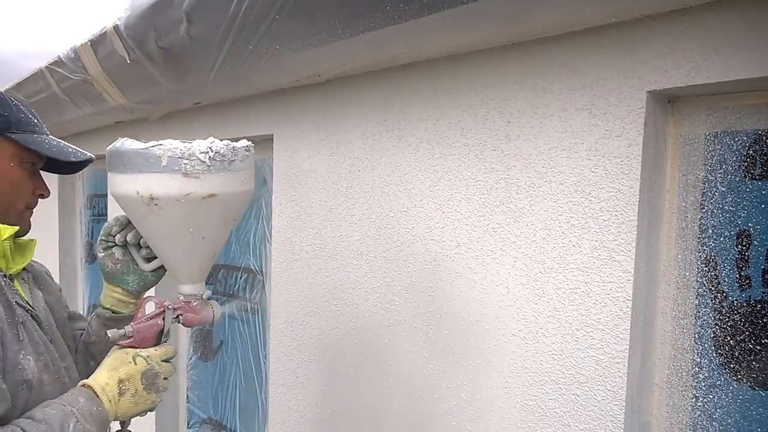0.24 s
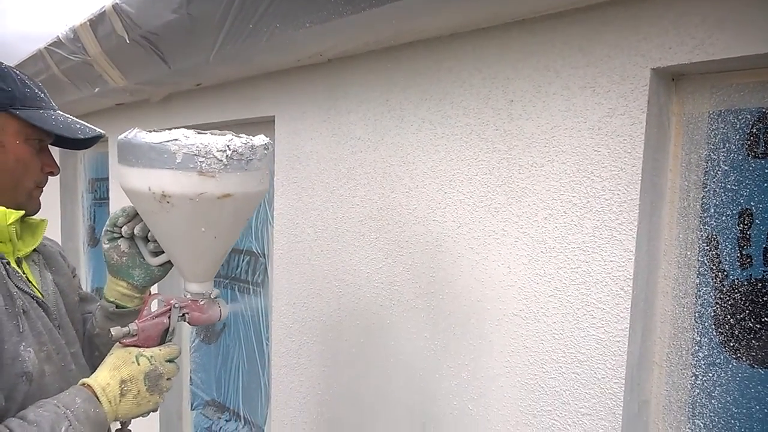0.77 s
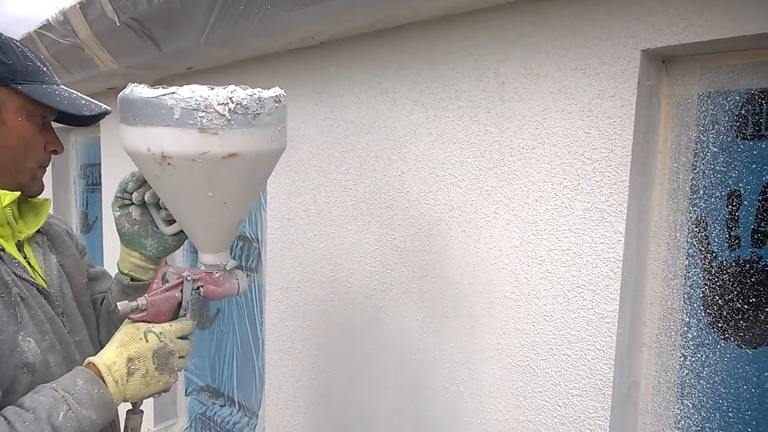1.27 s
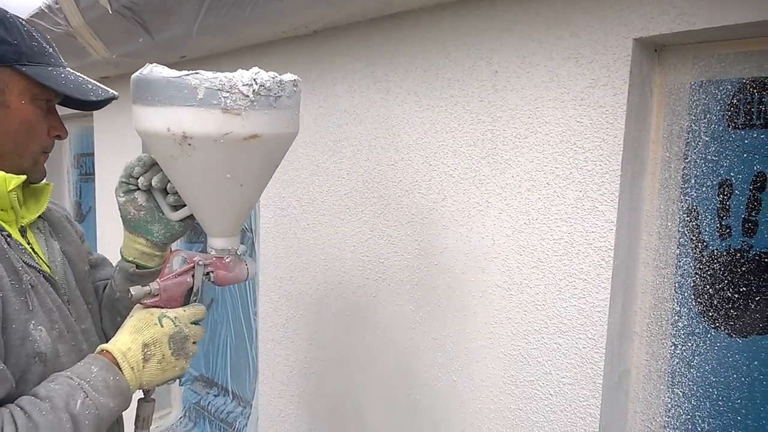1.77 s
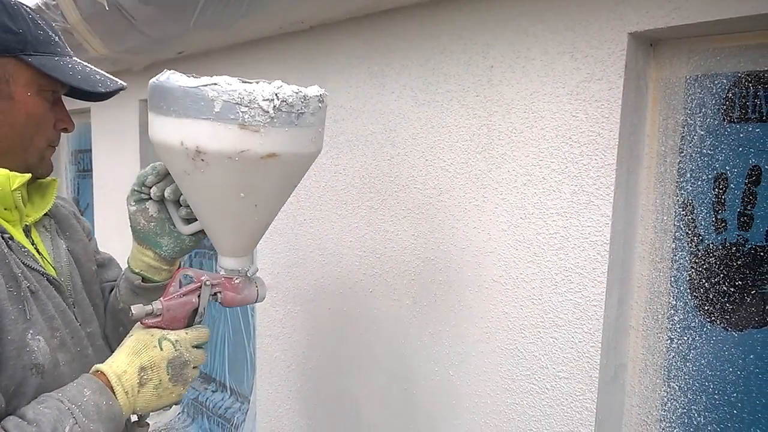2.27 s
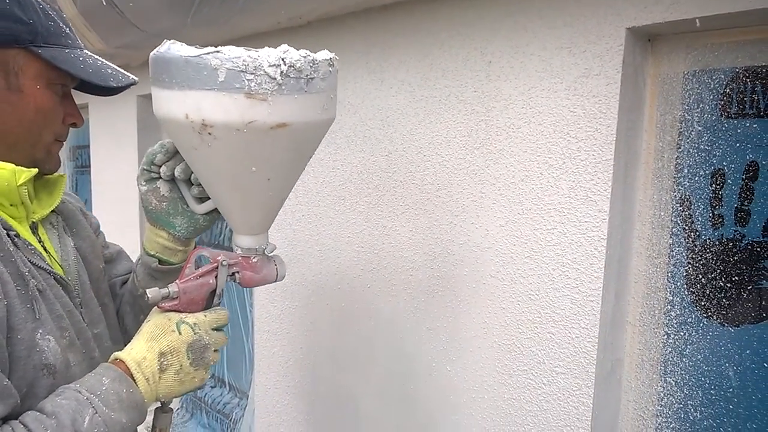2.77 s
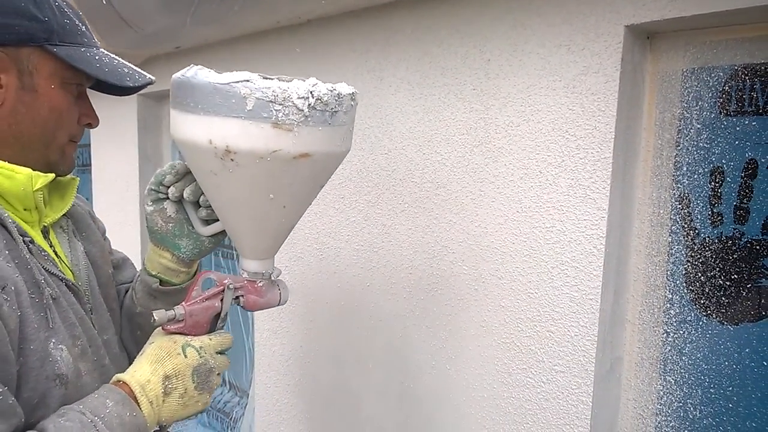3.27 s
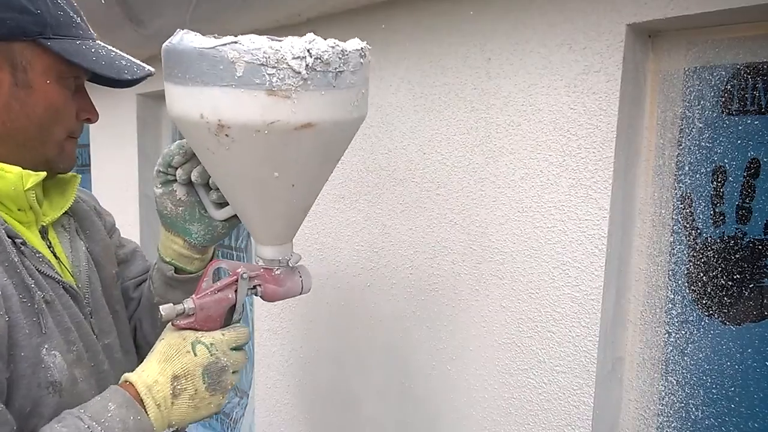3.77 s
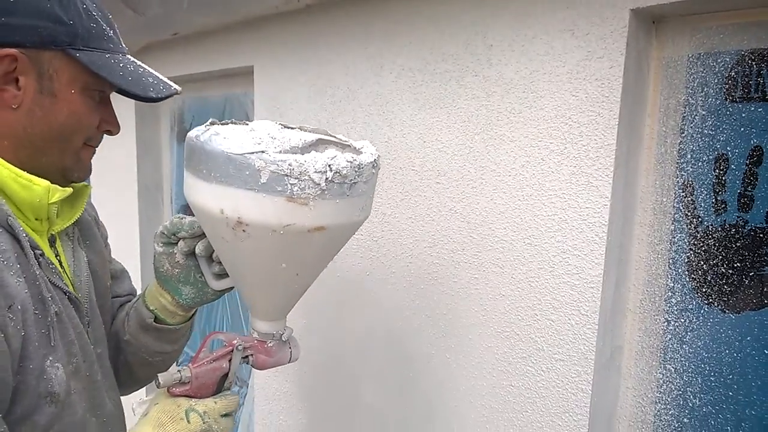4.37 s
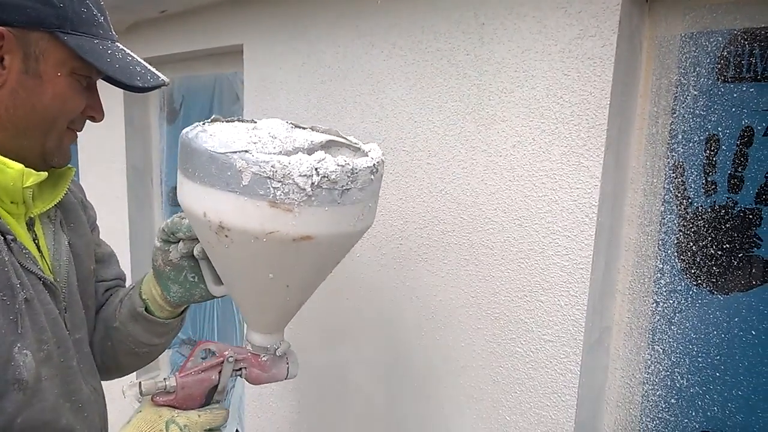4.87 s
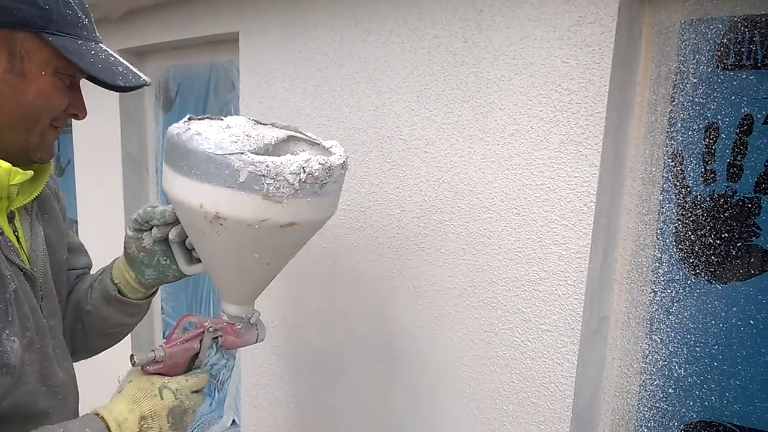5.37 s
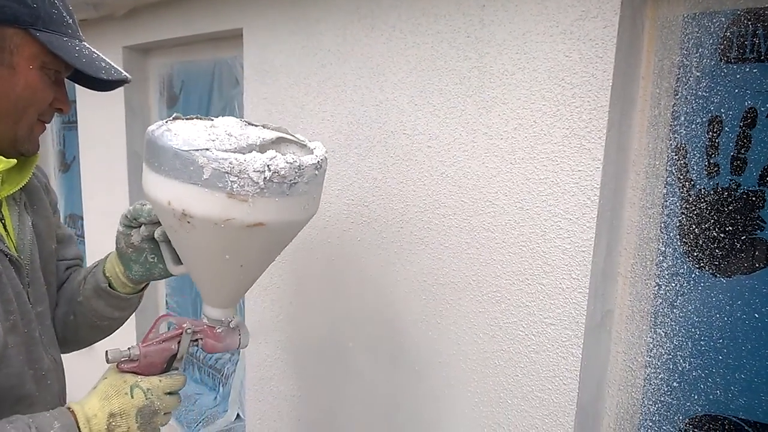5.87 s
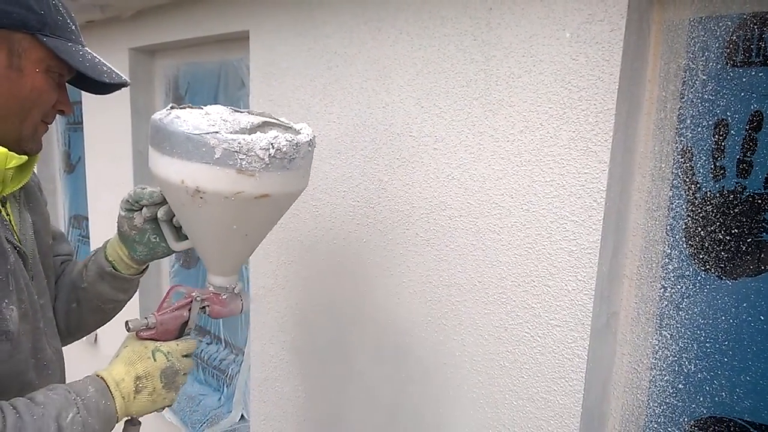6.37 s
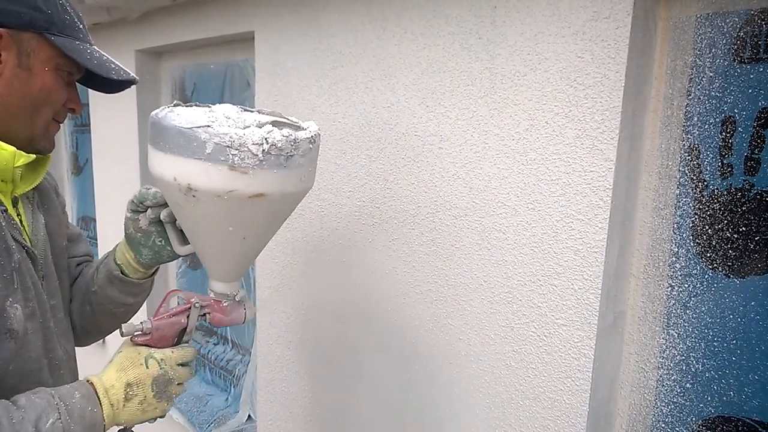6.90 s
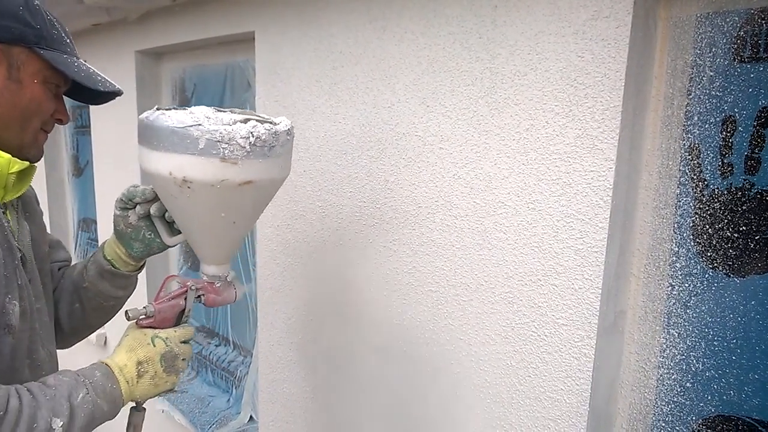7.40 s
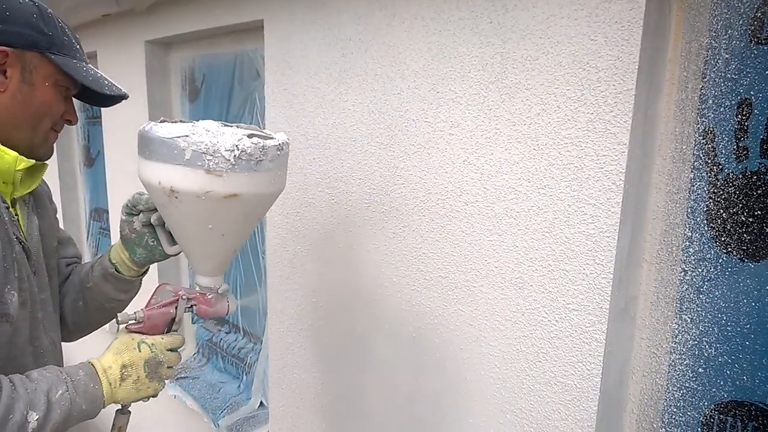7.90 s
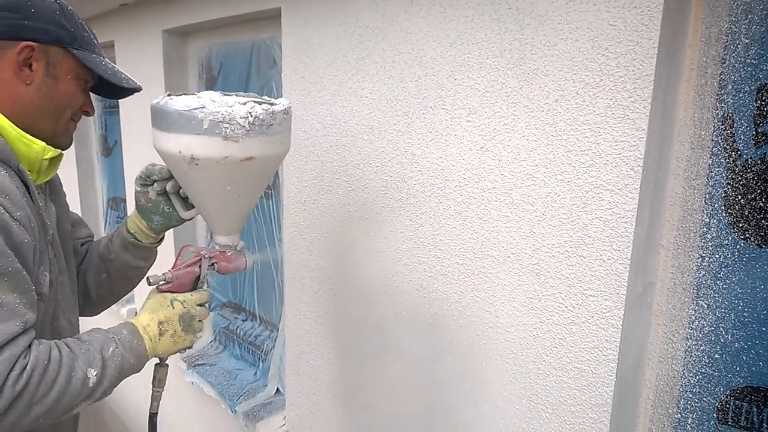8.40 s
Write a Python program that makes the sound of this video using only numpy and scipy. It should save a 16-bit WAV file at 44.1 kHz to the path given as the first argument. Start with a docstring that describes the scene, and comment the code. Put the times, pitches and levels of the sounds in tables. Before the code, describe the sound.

Outdoors by a house wall, compressed air streams from a plaster gun in a continuous, bright hiss. After two brief squeaks, a spitting spray builds, with fine ticking grit and short slurping surges, almost whistling midway and easing toward the end. Dull handling taps, a faint low rumble and small puffs of air on the microphone stay far behind the hiss.

```python
"""A hopper gun sprays plaster on an outside wall. From the start, compressed air hisses from its nozzle,
combed by the wall's echo as the gun sways, over soft knocks and a faint, puffy outdoor rumble.
The nozzle squeaks twice in the first second. From about 2 s, plaster torn up in the jet swells to a
sputtering rush with wet surges and a fine patter of grit. Near 4 s the nozzle almost whistles.
After 6 s the spray sinks back under the steadier hiss."""
import sys
import numpy as np
from scipy import signal
from scipy.fft import rfft, irfft, next_fast_len
from scipy.io import wavfile
from scipy.ndimage import uniform_filter1d, map_coordinates

SR = 44100
rng = np.random.default_rng(int(sys.argv[2]) if len(sys.argv) > 2 else 0)


def master_out(mix):
    """Clip the mix to full scale and print it as 16-bit PCM to the path in sys.argv[1]."""
    frames = np.transpose(np.atleast_2d(mix))
    ceiling = np.clip(frames, -1, 1)
    pcm = np.round(ceiling * 32767).astype(np.int16)
    wavfile.write(sys.argv[1], SR, pcm)


N = 381465


# air hiss: (time [s], level [dB])
AIR_LEVEL = [(0, -51), (.8, -49.5), (1.2, -50), (1.42, -49), (1.95, -49.5), (2.3, -48.8), (3.05, -49),
             (3.8, -49.5), (4.05, -50), (4.5, -49.2), (4.9, -50.5), (5.8, -48.5), (6.3, -50), (6.95, -48.5),
             (7.35, -50), (7.8, -51), (8.6, -51)]
# air jet spectrum: (frequency [Hz], relative density [dB])
AIR_SPECTRUM = [(1500, -41), (2450, -31), (2900, -25), (3500, -26), (4000, -29), (4400, -23.5),
                (5500, -18.5), (6300, -4.5), (7050, 0), (7900, -2.5), (9000, -7.5), (10300, -6.5),
                (11700, -1.7), (12900, -5), (13800, -9.5), (15800, -8)]

def air_jet(wander_share=0.007, wander_per_s=3):
    """Air leaves the nozzle in a slightly spitting hiss; its resonances wander as the gun turns."""
    flutter = spurts(per_s=83, fade_s=0.0071, depth=0.26) * amp(0.74 * wobble(350))
    hiss = coloured(turbulence(patchy_db=1.12), AIR_SPECTRUM)
    read_at = np.cumsum(1 + wander_share * wobble(wander_per_s))
    wandering = map_coordinates(hiss, [read_at], order=5, mode="mirror")
    return amp(curves(AIR_LEVEL)[0]) * unit(wandering * flutter)


# plaster spray: (time [s], level [dB])
PLASTER_LEVEL = [(0.0, -58.5), (1.25, -68), (1.45, -59), (1.8, -65), (2.12, -56), (2.27, -52), (2.45, -54),
                 (2.68, -56), (2.87, -48), (3.17, -50.5), (3.3, -50.5), (3.5, -52.5), (3.72, -49.5),
                 (4.1, -52.5), (4.32, -51.5), (4.47, -47), (4.8, -51), (5.15, -49.5), (5.5, -51),
                 (5.76, -49.5), (6.06, -50), (6.3, -55), (6.55, -53), (6.72, -55.5), (6.95, -52.5),
                 (7.24, -57), (7.5, -65), (7.75, -55.5), (8.1, -55), (8.4, -65), (8.6, -58)]
# plaster break-up spectrum: (frequency [Hz], relative density [dB])
PLASTER_SPECTRUM = [(2500, -38.5), (3400, -22.5), (4000, -26.5), (4550, -14.5), (5150, -8.5), (5550, -14),
                    (6700, 2.5), (7500, 0.8), (8500, -5), (9200, -1.5), (10400, 3.5), (12000, -1.5),
                    (13300, -3.5), (14200, -4.5), (15800, -4.5)]

def plaster(grains_per_s=2700, grit_share=0.21):
    """Lumps of plaster tear apart in spurts; their sand grains tick at random."""
    level_db = curves(PLASTER_LEVEL)[0] + 0.1 * wobble(22)
    feed = spurts(per_s=54, fade_s=0.0057, depth=0.45) * amp(0.78 * wobble(400))
    grit = unit(rng.standard_normal(N) * (rng.random(N) < grains_per_s / SR))
    spray = np.sqrt(1 - grit_share) * turbulence(patchy_db=1.0) + np.sqrt(grit_share) * grit
    return amp(level_db) * unit(coloured(spray * feed, PLASTER_SPECTRUM))


# wet surges: (time [s], half width [s], peak level [dB], centre [Hz])
WET_SURGES = [(1.44, .07, -74.5, 4600), (2.3, 0.35, -74.5, 4630), (3.07, .07, -68, 5000),
              (4.098, 0.12, -75.5, 3700), (5.08, .11, -80, 3700), (5.636, 0.044, -67, 4950),
              (6.002, .12, -70, 4600), (7.03, 0.11, -68.5, 4800), (7.9, 0.14, -82, 4000)]
# surge spectrum: (frequency [x centre], relative density [dB])
SURGE_SPECTRUM = [(.5, -31), (.8, -11.5), (.92, -7), (1, 2), (1.12, 2), (1.28, -16), (1.85, -34)]

def surges():
    """Thicker plaster passes the nozzle with a lower, slurping rush, each surge at its own pitch."""
    feed = turbulence(patchy_db=5.5) * spurts(per_s=80, fade_s=0.023, depth=1.5)
    out = np.zeros(N)
    for time_s, half_width_s, peak_db, centre_hz in WET_SURGES:
        rush = unit(coloured(feed, np.array(SURGE_SPECTRUM) * [centre_hz, 1]))
        out += swell(time_s, half_width_s, peak_db) * rush
    return out


# nozzle squeaks: (time [s], half width [s], peak level [dB], pitch [Hz])
NOZZLE_SQUEAKS = [(.17, 0.057, -55, 12100), (.72, .08, -59, 12800)]

def squeaks():
    """The nozzle gives brief, thin squeaks."""
    return sum(swell(time_s, half_width_s, peak_db) * breathy_tone(pitch_hz, half_band_hz=300)
               for time_s, half_width_s, peak_db, pitch_hz in NOZZLE_SQUEAKS)


# nozzle whistle: (time [s], pitch [Hz], level [dB])
NOZZLE_WHISTLE = [(3.4, 5280, -88), (3.8, 5360, -74), (4.2, 5200, -71), (4.55, 5090, -77), (4.8, 5100, -72),
                  (5.15, 5330, -77), (5.6, 5300, -85)]

def whistle():
    """The nozzle nearly whistles; the pitch sags and recovers."""
    pitch_hz, level_db = curves(NOZZLE_WHISTLE)
    return amp(level_db) * breathy_tone(pitch_hz, half_band_hz=160)


# top sizzle: (time [s], level [dB])
SIZZLE_LEVEL = [(0, -76), (.82, -69), (1.02, -63), (1.75, -67), (2.1, -58), (2.7, -72), (3.15, -54),
                (3.48, -64), (3.7, -61), (4.1, -65), (4.7, -64), (5.4, -67), (5.9, -80), (6.1, -64),
                (6.6, -57), (7.05, -63), (7.35, -75), (8.4, -70)]
# sizzle spectrum: (frequency [Hz], relative density [dB])
SIZZLE_SPECTRUM = [(11000, -30), (13300, -11), (14300, -9), (15800, -1)]

def sizzle():
    """A thin sizzle at the very top comes and goes."""
    return amp(curves(SIZZLE_LEVEL)[0]) * unit(coloured(turbulence(patchy_db=0.7), SIZZLE_SPECTRUM))


# turning points of the gun's sway: (time [s], echo lag [ms])
SWAY_TURNS = [(0, 1.66), (1.02, 1.525), (1.43, 1.63), (1.88, 1.565), (2.32, 1.675), (2.6, 1.625),
              (3.1, 1.735), (3.48, 1.65), (4.08, 1.845), (4.55, 1.675), (4.95, 1.775), (5.5, 1.55),
              (5.92, 1.68), (6.5, 1.48), (6.95, 1.615), (7.5, 1.385), (8.0, 1.325), (8.65, 1.33)]
# wall reflection: (frequency [Hz], gain [dB])
WALL_GAIN = [(3000, -17), (5300, -15.5), (6500, -11.5), (7500, -9), (8500, -13), (9600, -25), (11500, -16),
             (13200, -18.5), (15000, -18)]

def wall_echo(gun):
    """The wall returns the hiss after a changing lag, so a comb of peaks glides through it."""
    read_at = np.arange(N) - swing(SWAY_TURNS) * SR / 1000
    return coloured(map_coordinates(gun, [read_at], order=5), WALL_GAIN)


def nearby_echoes(gun, first_ms=1.0, last_ms=8, drift_ms=0.195, gain_db=-20, fade_db_per_ms=0.37):
    """Weak paths off hopper, worker and window recesses drift as the worker moves, rippling the hiss."""
    out = np.zeros(N)
    for lag_ms in np.linspace(first_ms, last_ms, 16):
        read_at = np.arange(N) - (lag_ms + drift_ms * wobble(3)) * SR / 1000
        out += amp(gain_db - fade_db_per_ms * lag_ms) * map_coordinates(gun, [read_at])
    return out


# handling knocks: (time [s], relative level [dB])
GUN_KNOCKS = [(0.204, -73), (0.847, -74), (3.396, -72), (4.043, -72), (4.678, -69), (5.238, -76),
              (5.326, -73), (5.908, -75), (5.968, -73), (6.609, -73), (7.25, -74), (7.874, -72)]

def knocks(rise_s=0.0025, t60_s=0.057, gain_db=15.0):
    """Soft, dull taps, as of the trigger and hopper shifting in gloved hands."""
    t = np.arange(SR // 10) / SR
    rise = 1 - np.exp(-t / rise_s)
    blows = np.zeros(N)
    for time_s, level_db in GUN_KNOCKS:
        envelope = rise * amp(level_db + gain_db - 60 * t / t60_s)
        blows[round(time_s * SR):][:len(t)] += envelope * rng.standard_normal(len(t))
    return coloured(blows, [(80, -2), (300, -3), (850, 7), (1600, -4), (5000, -27)])


def sputter(level_db=-89.0):
    """Small wet clots pop dully and irregularly under the hiss."""
    envelope = spurts(per_s=100, fade_s=0.0029, depth=0.5) - 1
    pops = envelope * rng.standard_normal(N)
    dull_pops = coloured(pops, [(100, -12), (350, -18), (900, -3), (1500, -3), (4000, -23)])
    return amp(level_db) * unit(dull_pops)


# air puffs: (time [s], peak level [dB])
AIR_PUFFS = [(.83, -74), (2.22, -76), (2.6, -70), (2.95, -73), (3.88, -75), (4.05, -71), (5.25, -68),
             (6.22, -73), (7.03, -74), (7.275, -72)]
# puff spectrum: (frequency [Hz], relative density [dB])
PUFF_SPECTRUM = [(20, -27), (60, 6.5), (150, -11), (300, -13), (900, -46)]

def puffs(half_width_s=0.017):
    """Stirred air brushes the microphone in short, low swells."""
    envelope = sum(swell(time_s, half_width_s, peak_db) for time_s, peak_db in AIR_PUFFS)
    return envelope * unit(coloured(rng.standard_normal(N), PUFF_SPECTRUM))


# outdoor background: (frequency [Hz], relative density [dB])
YARD_SPECTRUM = [(10, -8.5), (30, 2), (60, -3.5), (120, -7.5), (250, -12.3), (500, -15.5), (1000, -21),
                 (1500, -23), (2050, -19.5), (2450, -28.5), (3000, -22.5), (6000, -45), (16000, -46)]

def yard(level_db=-72.5, flutter_db=1.85, flutter_below_hz=220):
    """A faint outdoor rumble; light air makes its bass flutter."""
    noise = rng.standard_normal(N)
    bass = filtered(noise, lambda hz: hz < flutter_below_hz)
    fluttering_bass = unit(bass * amp(flutter_db * wobble(22))) * np.std(bass)
    rumble = unit(coloured(noise - bass + fluttering_bass, YARD_SPECTRUM))
    return amp(level_db + 1.17 * wobble(14)) * rumble


def turbulence(patchy_db):
    """White noise whose strength drifts in patches of time and frequency."""
    spectra = signal.stft(rng.standard_normal(N), nperseg=512)[2]
    patches = uniform_filter1d(rng.standard_normal(spectra.shape), size=5, axis=0)
    patches = uniform_filter1d(patches, size=26, axis=1)
    return signal.istft(spectra * amp(patchy_db * unit(patches)), nperseg=512)[1][:N]


def spurts(per_s, fade_s, depth):
    """Gain of random lumps: each hits the airstream at once and is blown away gradually."""
    lumps = (rng.random(N) < per_s / SR) * rng.exponential(size=N)
    power = signal.lfilter([1], [1, -np.exp(-1 / (fade_s * SR))], lumps)
    return np.sqrt(1 + depth * power)


def breathy_tone(pitch_hz, half_band_hz):
    """A narrow band of noise around a steady or moving pitch."""
    band = filtered(rng.standard_normal((2, N)), lambda hz: 1 / (1 + (hz / half_band_hz) ** 4))
    phase = 2 * np.pi * np.cumsum(pitch_hz * np.ones(N)) / SR
    return unit(band[0] * np.cos(phase) + band[1] * np.sin(phase))


def swing(turns):
    """A hand's motion: at rest at each turning point, fastest between them."""
    times_s, values = np.transpose(turns)
    index = np.arange(len(turns))
    stroke = np.interp(np.arange(N) / SR, times_s, index)
    eased = np.floor(stroke) + (1 - np.cos(np.pi * (stroke % 1))) / 2
    return np.interp(eased, index, values)


def swell(time_s, half_width_s, peak_db):
    """Gaussian rise and fall; the half width is one sigma."""
    return amp(peak_db) * np.exp(-((np.arange(N) / SR - time_s) / half_width_s) ** 2 / 2)


def wobble(knots_per_s):
    """A smooth random curve."""
    knots = rng.standard_normal(int(N * knots_per_s / SR) + 4)
    grid = np.linspace(0, N, N // 16)
    return np.interp(np.arange(N), grid, map_coordinates(knots, [grid * knots_per_s / SR]))


def curves(rows):
    """One value per sample for each column after the time."""
    times_s, *columns = np.transpose(rows)
    return [np.interp(np.arange(N) / SR, times_s, column) for column in columns]


def coloured(x, points):
    """x through (frequency [Hz], gain [dB]) points on a log axis."""
    points_hz, gain_db = np.transpose(points)
    return filtered(x, lambda hz: amp(np.interp(np.log(hz + 1), np.log(points_hz), gain_db)))


def filtered(x, response):
    """x through a frequency response."""
    size = next_fast_len(N + SR // 2)
    return irfft(rfft(x, size) * response(np.fft.rfftfreq(size, 1 / SR)), size)[..., :N]


def amp(db):
    """Decibels to gain."""
    return 10 ** (np.asarray(db) / 20)


def unit(x):
    """Scale to rms 1."""
    return x / np.sqrt(np.mean(x ** 2) + 1e-20)


def scene():
    """Gun, echoes and background, alike in both channels."""
    gun = air_jet() + plaster() + surges() + squeaks() + whistle() + sizzle()
    centre = gun + wall_echo(gun) + nearby_echoes(gun) + knocks() + sputter() + puffs() + yard()
    return np.array([centre, centre])


def record(dry):
    """Brick-wall low-pass at 15.8 kHz."""
    return filtered(dry, lambda hz: hz < 15800)


dry = scene()
out = record(dry)
master_out(out)
```